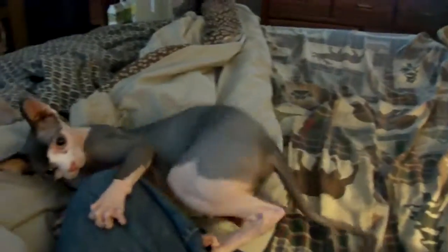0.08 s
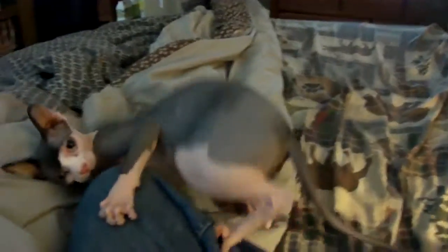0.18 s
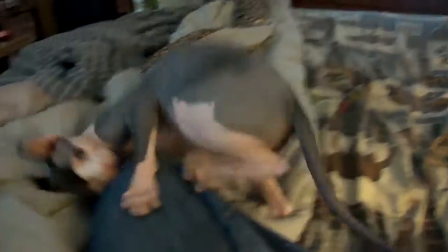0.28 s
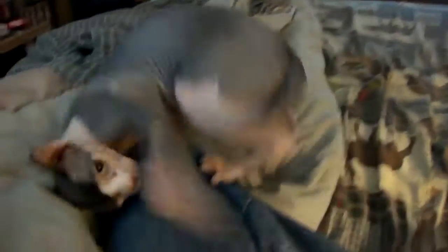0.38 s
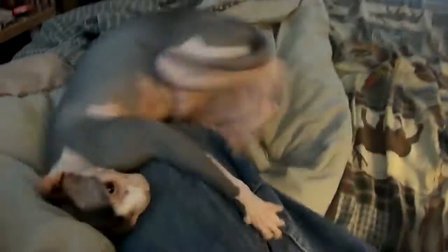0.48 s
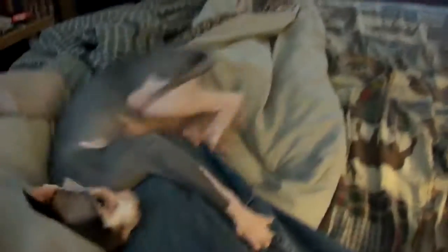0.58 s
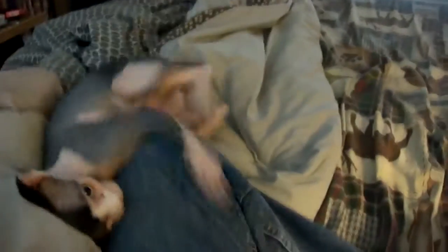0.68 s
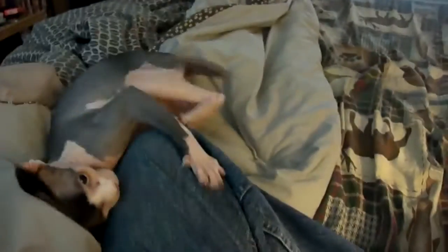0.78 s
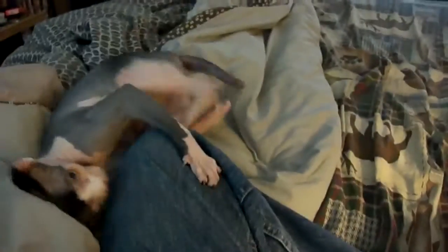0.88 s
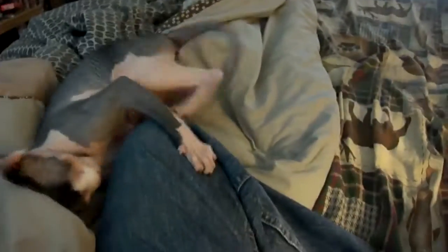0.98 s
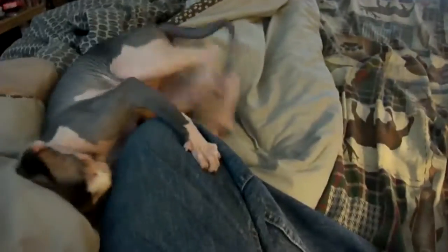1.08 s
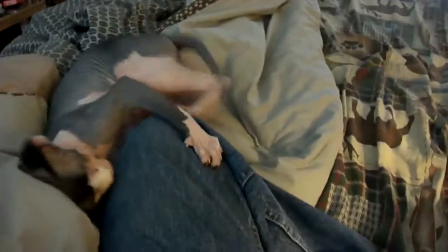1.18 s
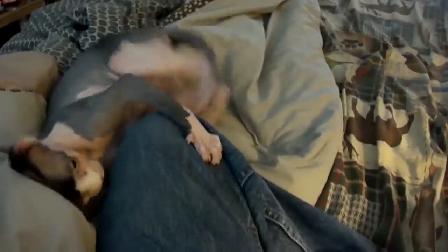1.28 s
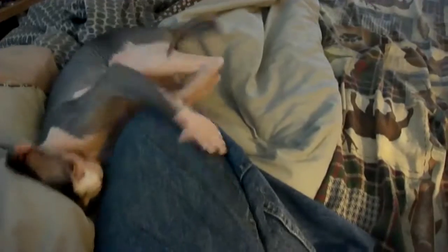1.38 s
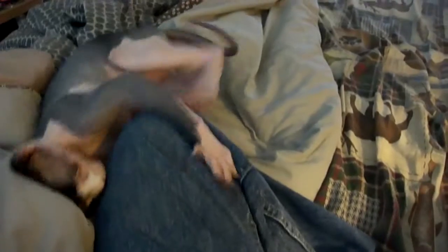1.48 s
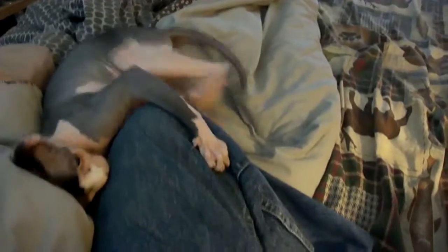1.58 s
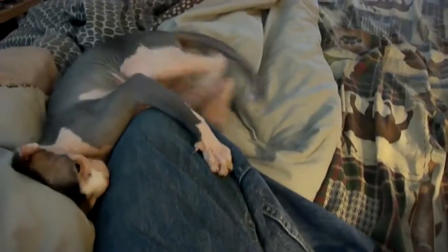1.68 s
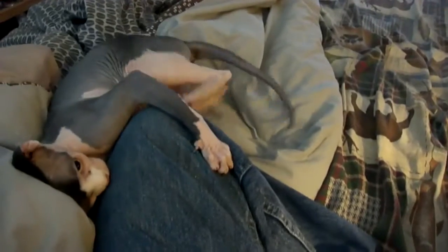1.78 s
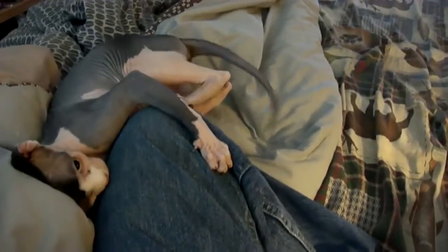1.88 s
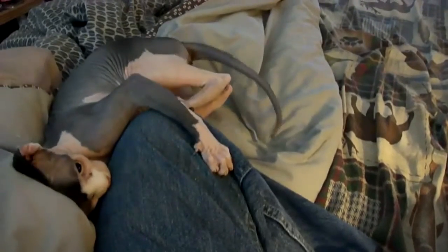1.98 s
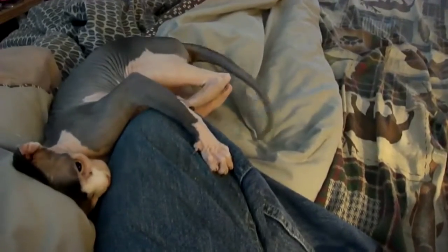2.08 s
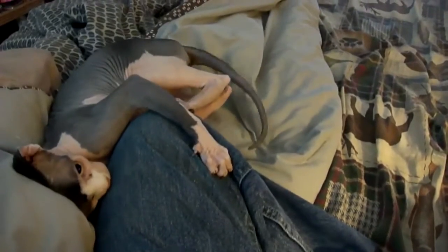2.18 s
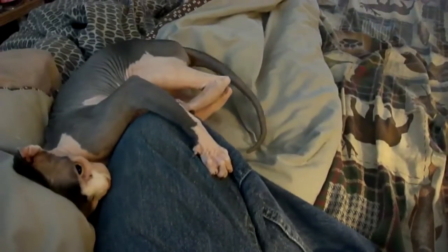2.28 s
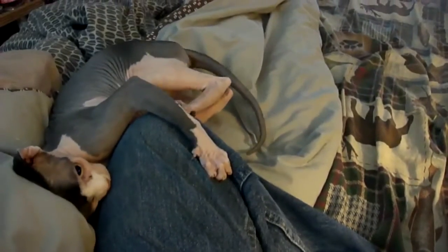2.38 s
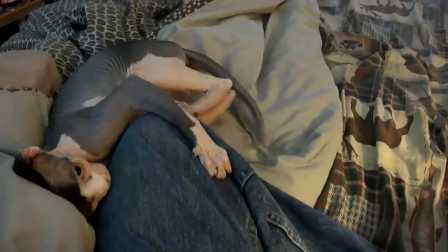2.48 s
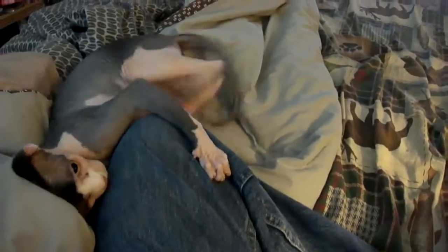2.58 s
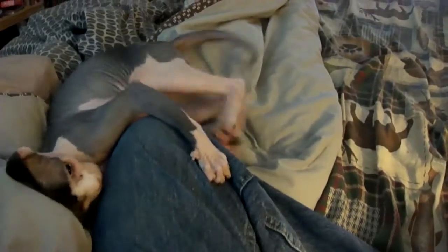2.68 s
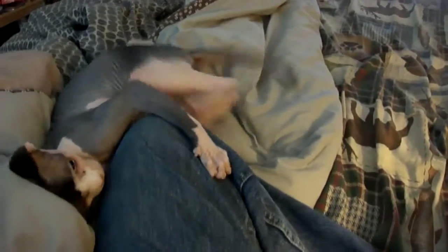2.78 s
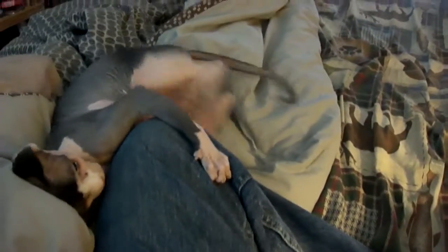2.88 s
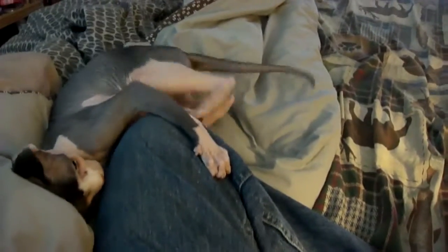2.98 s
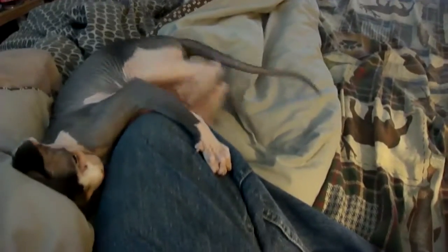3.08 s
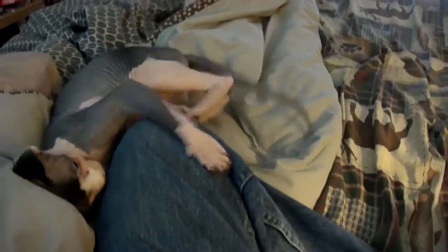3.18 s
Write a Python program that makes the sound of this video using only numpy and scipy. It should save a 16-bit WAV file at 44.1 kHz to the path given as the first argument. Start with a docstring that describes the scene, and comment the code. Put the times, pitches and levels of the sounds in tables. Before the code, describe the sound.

Claws snapping and scraping across fabric as a cat rolls on a bed, with dull knocks

```python
"""Small furnished bedroom, microphone close to a cat that rolls on a bed and kicks at a leg in jeans.
First its body slides on the bedding and light snags begin; then come the hardest thread snaps, with knocks.
Around one second the claws snap threads in a burst, and rake the weave in runs of tiny slips that quicken.
After a near-still pause the rubbing, snags and rakes return to the end, all over a faint hiss and whine.
Claws are filtered clicks, knocks damped sines, bedding and hiss shaped noise; sparse echoes make the room."""
import sys
import numpy as np
from scipy import signal
from scipy.fft import rfft, irfft
from scipy.io import wavfile

SR = 44100
rng = np.random.default_rng(int(sys.argv[2]) if len(sys.argv) > 2 else 0)


def digitize_waveform(pressure):
    """Quantize a signal to 16-bit integers and store it at the path in sys.argv[1].

    Rows of a 2-D input are taken as channels; values are limited to [-1, 1].
    """
    field = np.atleast_2d(pressure).T
    bounded = np.clip(field, -1, 1)
    quanta = np.round(bounded * 32767).astype(np.int16)
    wavfile.write(sys.argv[1], SR, quanta)


N = 143325  # samples, 3.25 s
TAPS = 2048  # length of a click, samples
HZ = np.fft.rfftfreq(TAPS, 1 / SR) + 1  # 1 Hz up, so that its logarithm exists
T = np.arange(N) / SR


def amp(db):
    """Decibels to gain."""
    return 10 ** (np.asarray(db) / 20)


def unit(x):
    """Scales to rms 1."""
    return x / np.sqrt(np.mean(x ** 2) + 1e-20)


def read(points, hz=HZ):
    """Reads a table on a log-frequency axis."""
    f, value = np.transpose(points)
    return np.interp(np.log(hz), np.log(f), value)


def add(mix, start_s, sound):
    """Mixes a sound in at a time."""
    part = mix[max(round(start_s * SR), 0):][:len(sound)]
    part += sound[:len(part)]


def bump(hz, octaves):
    """A bell over log frequency, height 1; octaves is its standard deviation."""
    return np.exp(-.5 * (np.log2(HZ / hz) / octaves) ** 2)


def impulse(colour_db):
    """The minimum-phase click with this spectrum, its energy packed early and scaled to 1."""
    log_gain = np.log(amp(colour_db))
    both_sides = np.r_[log_gain, log_gain[-2:0:-1]]
    click = np.fft.ifft(np.exp(np.conj(signal.hilbert(both_sides)))).real
    return click / np.linalg.norm(click)


def tinted(x, colour_db):
    """Gives a sound a spectrum."""
    return signal.fftconvolve(x, impulse(colour_db))[:len(x)]


def band(hz, octaves):
    """Noise in one bell-shaped band, rms 1."""
    colour_db = 20 * np.log10(bump(hz, octaves) + 0.00088)
    return unit(tinted(rng.standard_normal(N), colour_db))


RING_OCTAVES = 0.26  # width of a thread's ring
TUG_HZ = 1390  # below this the wider cloth moves with the thread


def tug(shelf_db):
    """A low shelf: the wider cloth moves with the thread."""
    return shelf_db / (1 + (HZ / TUG_HZ) ** 2)


# Single threads let go by a claw in two quick steps, close to the microphone:
# start_s, level_db (click peak before the steps), ring_hz, tug_db (low shelf), second_step_delay_s
THREAD_SNAGS = [(0.2226, -19, 1800, 20, 0.00059), (.273, -14.5, 3400, 12, 0.00021),
                (.297, -20, 3260, -4, 0.00027), (.303, -16.5, 3660, 7, .0002),
                (0.3356, -16.5, 2200, 34, 0.00081), (.3448, 0.5, 4130, 6, .00035),
                (0.419, -15, 3320, 3, 0.00023), (0.4343, -13, 3780, -21, 0.00028),
                (0.4449, -6.5, 2600, 14, 0.00085), (.4486, -5, 2750, 8, 0.000765),
                (0.6231, -3, 3740, 7, 0.000629), (.8677, -8, 4430, -18, 0.00028),
                (0.9547, -5, 3340, -14, 0.000049), (0.9952, -14.5, 3380, -2, 0.00024),
                (0.999, -17, 4400, -25, 0.00029), (1.0025, -7.5, 5200, -6.5, .0003),
                (1.0077, -17, 5400, -11, 0.00028), (1.016, -18, 5650, 0, 0.00023),
                (1.4026, -7.5, 2550, 8.5, 0.000508), (1.563, -19, 4100, -13, 0.00024),
                (2.4823, -9, 3650, 0.5, 0.00023), (2.5208, -20, 2780, 8, 0.00068),
                (2.613, -20, 4800, 14, .00022), (2.7789, -15.5, 5360, -31, 0.00016),
                (2.7825, -14.5, 3580, -7, 0.00045), (2.9634, -12.5, 4800, 0, .00025),
                (3.1725, -24.5, 3900, -14, 0.00036)]
# Spectrum of a snag or a fold's tick, before ring and tug: pitch_hz, relative_db
SNAG_SPECTRUM = [(50, -33), (200, -17.5), (450, -1), (1000, 4.5), (2000, 5.5), (3500, 4.5), (5300, 2),
                 (7500, -5.5), (10500, -14.5), (16000, -48)]
RING_DB = 6.5  # lift of the spectrum at the ring
RING_BUILD_HZ = 1380  # width of the band round the ring that takes a few cycles to build up
SECOND_STEP = .62  # gain against the first step
SNAG_FRAY, SNAG_FRAY_S = 0.067, .0014  # starting gain and decay time of the fibre noise


def snags():
    """Single threads snap free in two steps, swell and ring for a few cycles, and shake their fibres."""
    out, t = np.zeros(N), T[:TAPS]
    for start_s, level_db, ring_hz, tug_db, delay_s in THREAD_SNAGS:
        ring = RING_DB * bump(ring_hz, RING_OCTAVES)
        click = impulse(read(SNAG_SPECTRUM) + ring + tug(tug_db))
        # an all-pass filter delays the sound round the ring without changing its level
        build = -np.exp(-2j * np.arctan((HZ ** 2 - ring_hz ** 2) / (HZ * RING_BUILD_HZ)))
        two_steps = 1 + SECOND_STEP * np.exp(-2j * np.pi * HZ * delay_s)
        steps = irfft(rfft(click) * build * two_steps)
        fray = SNAG_FRAY * rng.standard_normal(TAPS) * np.exp(-t / SNAG_FRAY_S)
        fibres = signal.fftconvolve(click, fray)[:TAPS]
        add(out, start_s, amp(level_db) * (steps + fibres) / abs(click).max())
    return out


# A claw rakes across the weave: start_s, rise_s, fall_s, level_db (before spread and density scaling),
# first_slips_per_s, tug_db (low shelf), ring_hz
CLAW_RAKES = [(.226, .011, 0.0023, -30, 303, 8, 1420), (.271, 0.006, 0.0027, -26, 490, 7.5, 1380),
              (0.4204, .0065, 0.010, -19.5, 438, 12.5, 545), (.4448, 0.004, 0.0039, -20, 450, 9, 1200),
              (0.461, 0.038, 0.0086, -30, 510, -6, 3000), (.730, .040, 0.011, -39.5, 366, -55, 4930),
              (1.0085, 0.011, 0.016, -22.5, 330, -14, 6100), (1.0243, 0.0092, 0.010, -23, 352, -2.5, 3250),
              (1.260, .012, 0.0063, -32, 440, -20, 3350), (1.413, 0.0077, 0.012, -30.5, 330, 8, 1850),
              (1.434, 0.033, 0.0061, -33.5, 273, -4.5, 2240), (1.529, 0.035, 0.005, -37.5, 237, -4, 3280),
              (1.570, 0.025, 0.016, -29.5, 450, -8, 3180), (2.487, 0.021, 0.016, -25.5, 230, -7.5, 3800),
              (2.613, .021, 0.027, -24.5, 330, -6.5, 3130), (2.783, 0.023, 0.013, -22.5, 341, -4.5, 3900),
              (2.976, 0.026, 0.016, -38.5, 240, 6, 3500), (3.182, 0.022, 0.018, -34, 175, -0.5, 3100)]
# Spectrum of a slip, before ring, tug, thread pitch and tilt: pitch_hz, relative_db
RAKE_SPECTRUM = [(50, -67), (200, -15), (400, -6), (1000, -1), (1800, -4), (2600, -2), (3500, -2),
                 (5300, -6.5), (7500, -13.5), (10500, -21), (16000, -57)]
SPEEDUP = 2.2  # slip rate at the end of the rise, against the first
SLIP_JITTER, SLIP_SPREAD_DB = .4, 3  # uneven gaps (log scale, +/-) and force (+/-)
THREAD_HZ, THREAD_SPREAD_OCTAVES, THREAD_DB = 2300, 1.6, 8  # random thread pitch, its +/- range, its lift
RAKE_START_DB, RAKE_FALL_DB = -9, -12  # at the first slip; for each fall_s after the rise
RAKE_RING_DB = 2.5
EARLY_DB_PER_OCTAVE, LATE_DB_PER_OCTAVE = 0.37, -1.7  # the slips grow duller
FRAY_SHARE, FRAY_S = .72, .0008  # fibre noise: share of a slip's energy, decay time


def rakes():
    """Claw slips quicken and swell during the rise, then keep their rate as they fade; all grow duller."""
    out = np.zeros(N)
    fray = np.exp(-T[:TAPS // 8] / FRAY_S)
    for start_s, rise_s, fall_s, level_db, rate, tug_db, ring_hz in CLAW_RAKES:
        colour = read(RAKE_SPECTRUM) + tug(tug_db) + RAKE_RING_DB * bump(ring_hz, RING_OCTAVES)
        draws = rng.uniform(-1, 1, (200, 3))
        puffs = rng.standard_normal((200, len(fray)))
        t = 0
        for (jitter, size, pitch), fibres in zip(draws, puffs):
            if t > rise_s + 2 * fall_s:
                break
            progress = min(t / rise_s, 1)
            gap_s = 1 / (rate * SPEEDUP ** progress)
            if t < rise_s:
                swell_db = RAKE_START_DB * (1 - progress)
            else:
                swell_db = RAKE_FALL_DB * (t - rise_s) / fall_s
            force_db = level_db + SLIP_SPREAD_DB * size + swell_db
            tilt = np.interp(t, [0, rise_s + fall_s], [EARLY_DB_PER_OCTAVE, LATE_DB_PER_OCTAVE])
            thread_hz = THREAD_HZ * 2 ** (THREAD_SPREAD_OCTAVES * pitch)
            thread = THREAD_DB * bump(thread_hz, RING_OCTAVES)
            slip = np.sqrt(FRAY_SHARE / len(fray)) * unit(fibres * fray)
            slip[0] += np.sqrt(1 - FRAY_SHARE)
            sound = signal.fftconvolve(slip, impulse(colour + thread + tilt * np.log2(HZ)))
            # sparser slips are stronger, so the mean power does not depend on the rate
            add(out, start_s + t, amp(force_db) * np.sqrt(gap_s * SR) * sound)
            t += gap_s * np.exp(SLIP_JITTER * jitter)
    return out


# Folds in the cloth that pop: start_s, level_db (peak)
FOLD_TICKS = [(0.0884, -28.5), (0.7043, -22.5), (0.9413, -25.5), (.987, -22), (1.135, -25.5), (1.2398, -29),
              (1.3502, -25), (1.3765, -24.5), (1.7385, -32), (2.1218, -36.5), (2.7508, -29), (2.9158, -19),
              (3.075, -27)]
TICK_HZ = 3520


def ticks():
    """Small folds in the cloth pop out, each with one short tick."""
    out = np.zeros(N)
    click = impulse(read(SNAG_SPECTRUM) + RING_DB * bump(TICK_HZ, RING_OCTAVES))
    for start_s, level_db in FOLD_TICKS:
        add(out, start_s, amp(level_db) * click / abs(click).max())
    return out


# A paw or the body lands on taut bedding:
# start_s, level_db (before decay and low cut), pitch_hz, t60_s (time to fall 60 dB)
BED_THUMPS = [(.3455, -21.5, 766, 0.0099), (.4272, -10.5, 690, 0.0094), (0.6243, -9.5, 491, 0.015),
              (1.4043, -31.5, 418, 0.021)]
THUMP_LOW_CUT_HZ = 276


def thumps():
    """Taut bedding gives a short, damped knock."""
    out, t = np.zeros(N), T[:TAPS]
    for start_s, level_db, pitch_hz, t60_s in BED_THUMPS:
        decay = np.exp(-np.log(1000) * t / t60_s)
        add(out, start_s, -amp(level_db) * decay * np.sin(2 * np.pi * pitch_hz * t))
    return signal.lfilter(*signal.butter(2, THUMP_LOW_CUT_HZ, "high", fs=SR), out)


# The body slides on the bedding, points joined by straight lines: time_s, level_db
BODY_SLIDE = [(0, -48.5), (.12, -51.5), (.21, -45.5), (.50, -49.5), (.60, -46.5), (.8, -49.5), (1.18, -51),
              (1.55, -47), (1.70, -52.5), (1.9, -59), (2.28, -59.5), (2.34, -52), (2.42, -59.5),
              (2.48, -43.5), (2.75, -49.5), (3.25, -53)]
# Spectrum of the rubbing: pitch_hz, relative_db
SLIDE_SPECTRUM = [(40, -26), (120, -7.5), (400, 1.5), (1000, 2), (2000, -1), (4000, -5), (7500, -12.5),
                  (11000, -25), (16000, -54)]
# The mattress gives under a kick: centre_s, half_length_s (to 1/e), level_db (at the centre), pitch_hz
MATTRESS_HEAVES = [(.005, 0.0083, -43, 94), (0.651, 0.016, -42.5, 457), (0.77, 0.024, -42.5, 417)]
HEAVE_OCTAVES = 0.58
CREASES_PER_S, CREASE_SPREAD_DB = 500, 6
CREASE_SHARE = 0.13  # of the rubbing's power, the rest is smooth noise


def bedding():
    """Soft rubbing with small creases, and dull heaves of the mattress."""
    hits = (rng.random(N) < CREASES_PER_S / SR) * rng.choice([-1, 1], N)
    creases = hits * amp(CREASE_SPREAD_DB * np.minimum(rng.exponential(1, N), 4))
    smooth = rng.standard_normal(N)
    friction = np.sqrt(CREASE_SHARE) * unit(creases) + np.sqrt(1 - CREASE_SHARE) * smooth
    rub = tinted(friction, read(SLIDE_SPECTRUM)) * amp(np.interp(T, *np.transpose(BODY_SLIDE)))
    heaves = np.zeros(N)
    for centre_s, half_s, level_db, pitch_hz in MATTRESS_HEAVES:
        swell = np.exp(-((T - centre_s) / half_s) ** 2)
        heaves += amp(level_db) * swell * band(pitch_hz, HEAVE_OCTAVES)
    return rub + heaves


# How long each band hangs in the bedroom: pitch_hz, t60_s
BEDROOM_T60 = [(250, 0.25), (1500, 0.27), (4600, 0.3), (10000, 0.25)]
# Spectrum of the reflections as they start: pitch_hz, relative_db
BEDROOM_SPECTRUM = [(100, -5.5), (1200, 5), (3500, -1), (5800, -2), (10000, 0.5)]
ROOM_BUILD_S = 0.0078  # the reflections rise in strength over this time


def tail():
    """Sparse reflections of a furnished bedroom, each band dying at its own speed."""
    t = T[:SR // 2]
    sparse = rng.random(len(t)) < 1 / 10
    taps = rng.standard_normal(len(t)) * sparse * np.minimum(t / ROOM_BUILD_S, 1)
    hz, at, z = signal.stft(taps, SR, nperseg=256)
    colour = amp(read(BEDROOM_SPECTRUM, hz + 1))[:, None]
    decay = np.exp(-np.log(1000) * at / read(BEDROOM_T60, hz + 1)[:, None])
    h = signal.istft(z * colour * decay, SR)[1]
    return h / np.linalg.norm(h)


ROOM_TURN_S = .04  # the next of five sets of reflections fades in this often


def room(x, count=5):
    """Close sounds pass through five random sets of reflections in turn, so no fixed tones stand out."""
    out = np.zeros(N)
    for k in range(count):
        # half a sine: each set is open for two turns and then closed until it comes round again
        window = np.sin(np.pi / 2 * np.minimum((T / ROOM_TURN_S + k) % count, 2))
        out += signal.fftconvolve(x * window, tail())[:N]
    return np.sqrt(2) * out


# Spectrum of the room's steady hiss: pitch_hz, relative_db
HISS_SPECTRUM = [(25, -18), (120, -9.5), (300, 1), (1300, -3), (2500, -9.5), (5000, -16), (8000, -18),
                 (11000, -27), (16000, -62)]
HISS_DB = -53.5  # rms
WHINE_HZ, WHINE_OCTAVES, WHINE_DB = 7870, 0.02, -75


def hiss():
    """Steady room noise with a faint high whine, itself a very narrow band of noise."""
    noise = amp(HISS_DB) * tinted(rng.standard_normal(N), read(HISS_SPECTRUM))
    return noise + amp(WHINE_DB) * band(WHINE_HZ, WHINE_OCTAVES)


SNAG_SEND_DB, RAKE_SEND_DB, THUMP_SEND_DB = -18.5, -15, -12.5  # into the room, which adds 3 dB
ECHO_S, ECHO_DB = .0044, -21  # one near reflection


def scene():
    """Claws and bedding close by, one near reflection and the room behind."""
    snag, rake, thump = snags() + ticks(), rakes(), thumps()
    near = snag + rake + thump
    add(near, ECHO_S, amp(ECHO_DB) * near)
    send = amp(SNAG_SEND_DB) * snag + amp(RAKE_SEND_DB) * rake + amp(THUMP_SEND_DB) * thump
    return (near + room(send) + bedding() + hiss())[None]


FULL_SCALE, EDGE_HZ = .92, 16000  # clipping level and upper band edge


def record(dry):
    """The recorder clips at its full scale, then limits the band."""
    low_pass = signal.firwin(255, EDGE_HZ, window=("kaiser", 8), fs=SR)
    return signal.oaconvolve(np.clip(dry, -FULL_SCALE, FULL_SCALE), low_pass[None], "same")


dry = scene()
out = record(dry)
digitize_waveform(out)
```